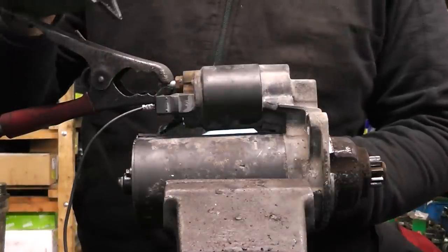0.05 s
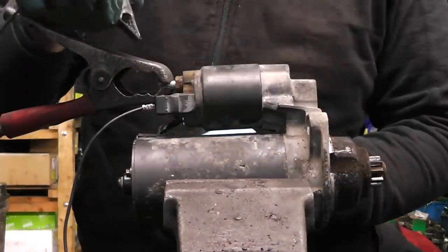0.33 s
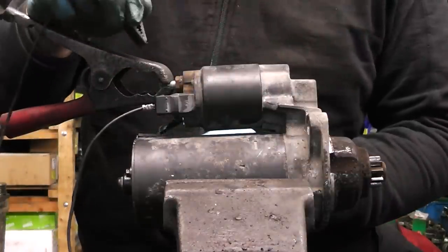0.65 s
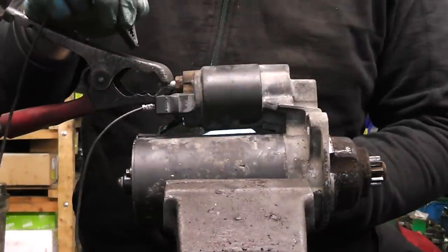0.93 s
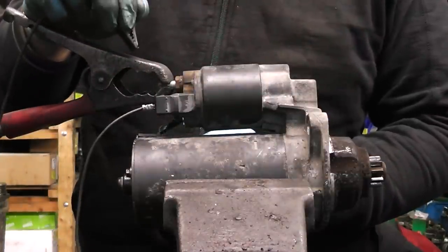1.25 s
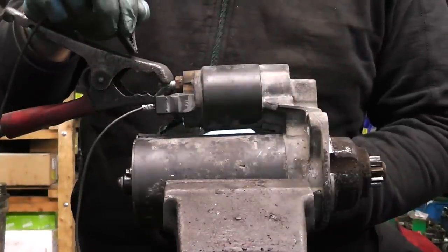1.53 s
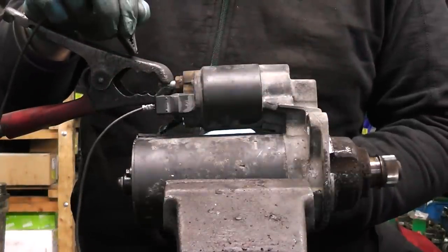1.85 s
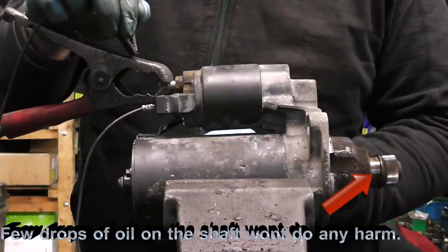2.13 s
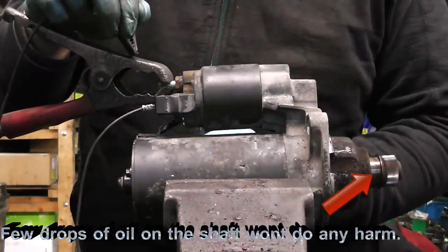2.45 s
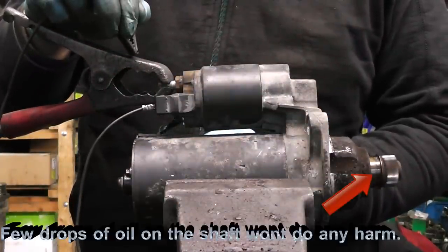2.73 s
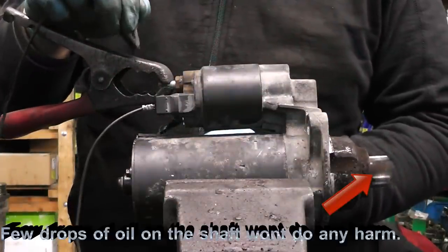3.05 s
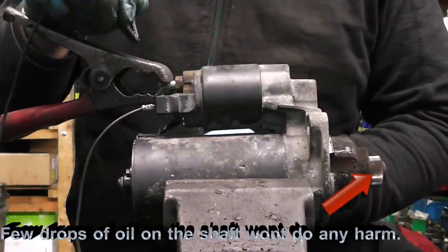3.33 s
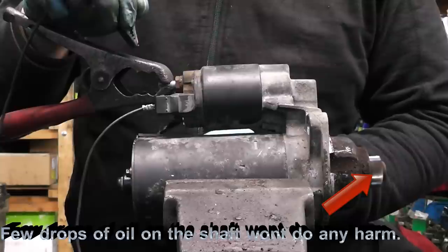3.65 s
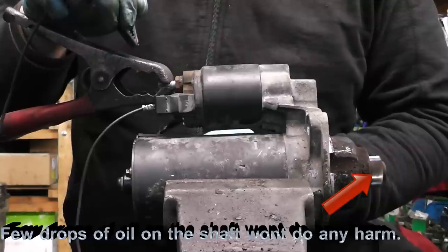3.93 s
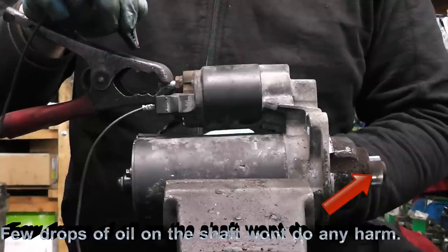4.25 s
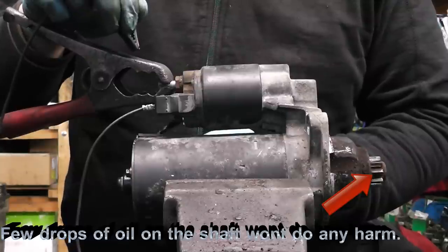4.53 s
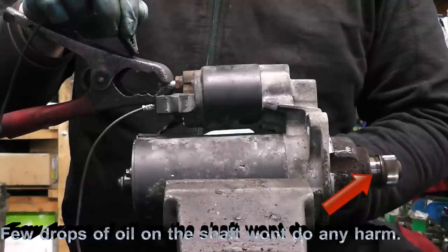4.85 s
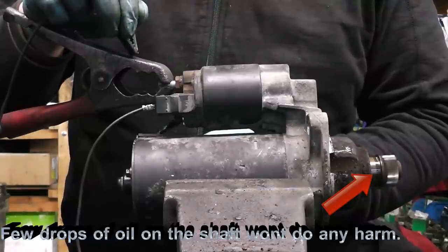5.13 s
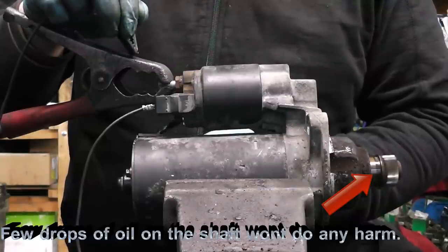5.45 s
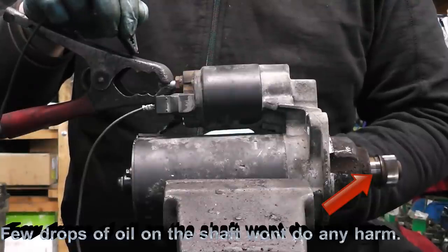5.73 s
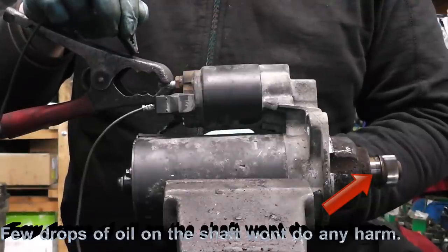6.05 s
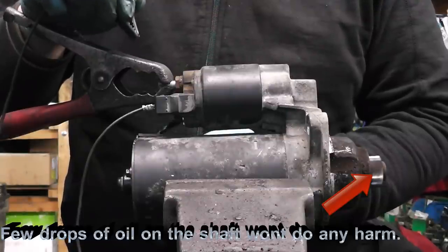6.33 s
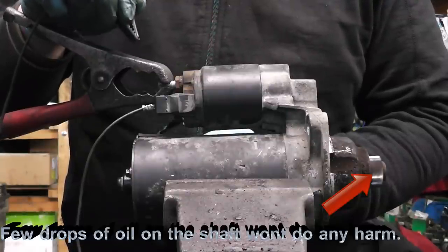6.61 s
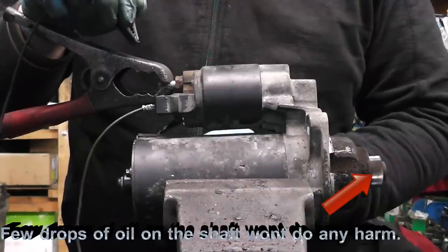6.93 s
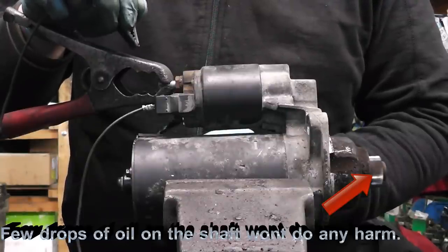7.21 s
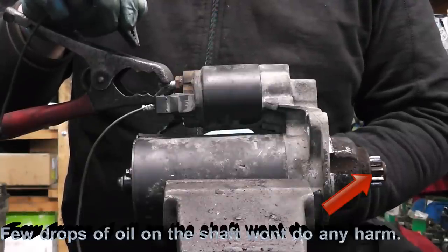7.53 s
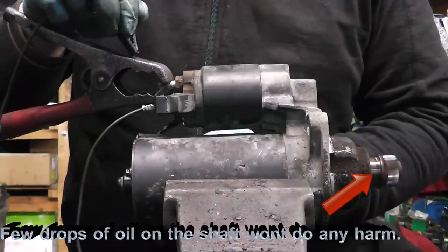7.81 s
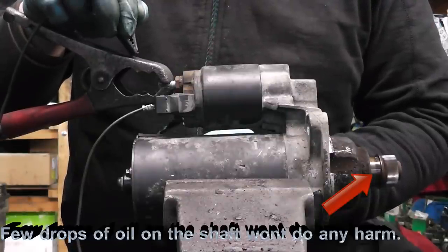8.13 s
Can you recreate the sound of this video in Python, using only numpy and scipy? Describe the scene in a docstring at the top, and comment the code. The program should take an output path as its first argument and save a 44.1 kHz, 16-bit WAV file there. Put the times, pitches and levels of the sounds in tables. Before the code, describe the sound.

Close up in a workshop, an electric starter engages with sharp metal clacks, whines at speed and ticks down to a stop.

```python
"""A starter motor clamped in a vice, heard close up: run twice on jumper leads, then started a third time.
Each time the solenoid clacks the pinion out and the armature whirs up, brushes scraping the commutator.
With the current off, the pinion knocks back and the motor coasts to a stop, ticking once a turn.
A gain control ducks at each clack, so the whir swells in from almost nothing.
Before the first start a sleeve rustles and the lead taps the terminal; a low workshop rumble lies under all."""
import sys
import numpy as np
from scipy import signal
from scipy.fft import rfft, irfft, next_fast_len
from scipy.io import wavfile
from scipy.ndimage import uniform_filter1d

SR = 44100
rng = np.random.default_rng(int(sys.argv[2]) if len(sys.argv) > 2 else 0)


def master_out(mix):
    """Clip the mix to full scale and print it as 16-bit PCM to the path in sys.argv[1]."""
    frames = np.transpose(np.atleast_2d(mix))
    ceiling = np.clip(frames, -1, 1)
    pcm = np.round(ceiling * 32767).astype(np.int16)
    wavfile.write(sys.argv[1], SR, pcm)


N = 360738
TIME = np.arange(N) / SR

# motor runs: current on t/s, current off t/s, free speed/(turns/s), high bar under a brush t/s
MOTOR_RUNS = [(1.827, 3.2525, 153.2, 4.473), (4.880, 6.322, 150.7, 7.4784), (8.004, 9.4, 148, 8.1)]
# stereo width, side against mid: f/Hz, level/dB
STEREO_WIDTH = [(100, -26), (400, -20), (900, -17), (2000, -28), (4000, -14), (8000, -12), (13000, -6.5)]


def amp(db):
    """Decibels to gain."""
    return 10 ** (np.asarray(db) / 20)


def curve_at(points, hz):
    """Reads a curve of breakpoints along a log-frequency axis."""
    f, value = np.transpose(points)
    return np.interp(np.log(hz + 1), np.log(f + 1), value)


def add(mix, start_s, sound):
    """Mixes a sound in at its cue."""
    part = mix[..., round(start_s * SR):][..., :sound.shape[-1]]
    part += sound[..., :part.shape[-1]]


def wander(n, hz):
    """Smooth random modulation of rms 1, rolling off above hz."""
    size = next_fast_len(n)
    f = np.fft.rfftfreq(size, 1 / SR)
    spectrum = rfft(rng.standard_normal(n), size) / (1 + (f / hz) ** 4)
    return unit_rms(irfft(spectrum, size)[:n])


def unit_rms(x):
    """Scales to rms 1."""
    return x / np.sqrt(np.mean(x ** 2) + 1e-20)


def levelled(x, size=5000):
    """Irons out a sound's slow swells and keeps its grain."""
    return x / np.sqrt(abs(uniform_filter1d(x ** 2, size)) + 1e-12)


def band(x, hz, kind):
    """Keeps the low or the high side of a sound."""
    return signal.sosfiltfilt(signal.butter(4, hz, kind, fs=SR, output="sos"), x)


def colour(x, spectrum, resonances=(), size=4096):
    """Minimum-phase EQ: a broad curve with resonances standing on it."""
    f = abs(np.fft.fftfreq(size, 1 / SR))
    peaks_db = sum(lift / (1 + (2 * (f - hz) / width) ** 2) for hz, width, lift in resonances)
    log_gain = np.log(amp(curve_at(spectrum, f) + peaks_db))
    response = np.fft.ifft(np.exp(np.conj(signal.hilbert(log_gain)))).real
    return signal.oaconvolve(x, response[:size // 2])[:len(x)]


def room_tone(level_db=-41, left_db=1.59, swell_db=-0.96, width=.11):
    """A bed of low workshop rumble, nearly mono, gently wavering."""
    # rumble spectrum: f/Hz, level/dB
    rumble = [(15, -29), (28, 0), (60, -6), (92, -2), (190, -10), (300, -17), (480, -23), (820, -17.5),
              (1300, -25.5), (2050, -31.5), (2500, -49), (3300, -53), (5000, -43), (7000, -52),
              (16000, -53)]
    mid, side = (unit_rms(colour(rng.standard_normal(N), rumble, size=16384)) for _ in range(2))
    level = amp(level_db + swell_db * wander(N, 2.7))
    return level * np.array([(mid + width * side) * amp(left_db), (mid - width * side) * amp(-left_db)])


def room_reverb(x, wet_db=-21):
    """A small, cluttered room: sparse echoes, each band dying at its own rate."""
    # reverb time: f/Hz, t60/s
    decay_times = [(100, 0.21), (1000, 0.24), (4000, 0.033), (15000, 0.0467)]
    echoes = rng.choice([-1., 1.], (2, SR // 2)) * (rng.random((2, SR // 2)) < .1)
    hz, t, bands = signal.stft(echoes, SR, nperseg=256)
    decay = amp(-60 * t / curve_at(decay_times, hz)[:, None])
    tail = signal.istft(bands * decay, SR, nperseg=256)[1]
    return amp(wet_db) * signal.oaconvolve(x[None], tail / np.linalg.norm(tail[0]), axes=1)[:, :N]


def near_reflections(x, size=300):
    """Reflections off vice and bench differ left and right, widening the treble most."""
    taps = rng.standard_normal(size) * np.linspace(1, 0, size)
    side = colour(signal.oaconvolve(x, taps / np.linalg.norm(taps))[:N], STEREO_WIDTH)
    return np.array([x + side, x - side])


def sleeve(grain_db=0.5):
    """Cloth rubs faintly as the hand brings the lead to the terminal; each stroke swells and fades."""
    # strokes of glove and sleeve: centre t/s, length/s, level/dB
    strokes = [(.02, 0.065, -50.5), (0.126, 0.138, -63.5), (0.333, 0.31, -61.5), (0.728, 0.14, -59),
               (0.835, 0.13, -65.5)]
    # rustle spectrum: f/Hz, level/dB
    cloth = [(1000, -12), (3200, -12), (4400, 2), (6000, 0), (8500, -3), (12000, 1), (16000, -8)]
    level = sum(amp(db) * np.exp(-(2 * (TIME - s) / length) ** 2) for s, length, db in strokes)
    rustle = unit_rms(colour(rng.standard_normal(N), cloth))
    return rustle * level * amp(grain_db * wander(N, 120))


def ring(modes, rise_s=0.00012, detune=0.036):
    """Damped modes set going by one blow; no two blows land quite alike."""
    t = np.arange(SR // 4) / SR
    out = np.zeros(len(t))
    for hz, db, t60 in modes:
        pitch = hz * (1 + detune * rng.standard_normal())
        out += amp(db - 60 * t / t60) * np.sin(2 * np.pi * (pitch * t + rng.random()))
    return out * (1 - np.exp(-t / rise_s))


def crack(hold_s=0.004, rattle_db=-12, rattle_t60=0.14):
    """Steel on steel: a sharp burst, then a short rattle of the loose parts."""
    # impact spectrum: f/Hz, level/dB
    steel = [(100, -9.5), (900, 3.5), (2000, 2), (3000, -3), (4500, 4.5), (8000, 2), (12000, 3),
             (16000, -10)]
    t = np.arange(SR // 4) / SR
    envelope = np.exp(-(t / hold_s) ** 4) + amp(rattle_db - 60 * t / rattle_t60)
    return colour(envelope * rng.standard_normal(len(t)), steel)


def jumper_lead():
    """The lead ticks lightly on the terminal and its clamp rings."""
    # touches: t/s, tick level/dB, ring level/dB
    touches = [(0, -60, -39), (0.5544, -44.5, -48), (0.561, -51.5, -61), (.602, -59, -55),
               (0.699, -54, -48), (0.8346, -57, -39.5)]
    # clamp modes: f/Hz, level/dB, t60/s
    clamp = [(1075, 0.5, 0.054), (1385, 1.5, 0.058), (1595, -5.5, 0.25), (1950, -1, 0.05),
             (4500, -13, 0.092), (4640, -16, 0.06)]
    out = np.zeros(N)
    for s, tick_db, ring_db in touches:
        add(out, s, amp(tick_db) * crack() + amp(ring_db) * ring(clamp))
    return out


def solenoid():
    """Plunger, contacts and pinion hit their stops: steel cracks, the housing rings, the bench thuds."""
    # blows: t/s, crack level/dB, ring level/dB, thud level/dB
    blows = [(1.8128, 2.5, 1.5, -8), (1.818, -11, 5.5, 1.5), (1.833, 2, -2, -5.5), (3.2551, -7, -8, -10),
             (3.2720, -27, -16, -13.5), (3.292, -26, -20, -11.5), (4.8410, -28, -34, -36),
             (4.8579, 4.5, -7, 1), (4.864, -2.5, 9.5, 6), (4.88, 0.5, -5, -9), (6.322, -11, -4, -9),
             (6.338, -24.5, -9.5, -9.5), (6.355, -30, -8, -11), (7.9681, -35, -28.5, -36), (7.985, 6, 2, 4),
             (7.9921, -4, 3, -26.5), (8.004, 2, -4, -8)]
    # housing modes: f/Hz, level/dB, t60/s
    housing = [(717, -4.5, 0.065), (811, -13, 0.11), (986, -6, 0.078), (1275, -13, 0.13), (1413, -8, 0.047),
               (1570, -6, 0.063), (1847, 2, 0.048), (2150, -14, 0.1)]
    # bench modes: f/Hz, level/dB, t60/s
    bench = [(104.7, -1.5, 0.064), (130, 0.5, 0.089), (187.7, 5.5, 0.063), (257, -25, 0.035),
             (330.8, 0, 0.053), (436, -6, 0.024), (547, -4.5, 0.054)]
    out = np.zeros(N)
    for s, crack_db, ring_db, thud_db in blows:
        clack = amp(crack_db) * crack() + amp(ring_db) * ring(housing)
        add(out, s, clack + amp(thud_db) * ring(bench, rise_s=0.0017))
    return out


def shaft(on, off, free_speed, high_bar_at):
    """Armature speed (turns/s) and turns: current spins it up, friction and drag bring it to rest."""
    spin_up_s, creep_s, creep_share = .19, .436, .23  # a quick rise, then a creep to free speed
    friction, drag_s = 98.4, 6.7  # turns/s lost each second; time constant of the drag
    driven, coasted = np.clip(TIME, on, off) - on, np.maximum(TIME - off, 0)
    shortfall = (1 - creep_share) * np.exp(-driven / spin_up_s) + creep_share * np.exp(-driven / creep_s)
    speed = free_speed * (1 - shortfall)
    speed = np.maximum((speed + friction * drag_s) * np.exp(-coasted / drag_s) - friction * drag_s, 0)
    turns = np.cumsum(speed) / SR
    return speed, turns - np.interp(high_bar_at, TIME, turns)


def snap(length_s=0.001):
    """One short scratch of a brush over the edge of a commutator bar."""
    t = np.arange(SR // 100) / SR
    return np.exp(-(t / length_s) ** 2) * rng.standard_normal(len(t))


def coasting_ticks(tick_db=-12.5, gentle_speed=26, skim_speed=70, skim_db=-6):
    """The high bar snaps a brush once a turn, clearest as the motor slows; then the last bars slip by."""
    # tall bars catching just before the stop: t/s, level/dB
    last_bars = [(4.509, -17), (4.549, -21), (4.555, -24), (4.61, -27), (7.572, -23), (7.603, -33),
                 (7.613, -23), (7.633, -31)]
    # spectrum of a brush snap: f/Hz, level/dB
    snap_tone = [(300, -36), (1500, -22), (3000, -6), (4500, 2), (7000, 8), (9600, 5.5), (12500, -5),
                 (14500, -17), (16000, -24)]
    out = np.zeros(N)
    for on, off, free_speed, high_bar_at in MOTOR_RUNS:
        speed, turns = shaft(on, off, free_speed, high_bar_at)
        new_turn = np.diff(np.floor(turns)) > 0
        for i in np.flatnonzero(new_turn & (TIME[1:] > off) & (speed[1:] > 10)):
            force = np.tanh(speed[i] / gentle_speed) * amp(tick_db + skim_db * (speed[i] / skim_speed) ** 2)
            add(out, TIME[i] - .0005, force * snap())
    for s, db in last_bars:
        add(out, s, amp(db) * snap())
    return colour(out, snap_tone)


def brushes(turns, speed, bar_db=-4, high_bar_db=10, uneven=0.46, skim_speed=95, bars=23):
    """Carbon scrapes the commutator and catches on each bar's edge; one high bar ticks once a turn."""
    release_per_ms = 0.52
    place = turns * bars
    heights = amp(bar_db) * np.exp(uneven * rng.standard_normal(bars))
    heights[0] = amp(high_bar_db)
    since_edge_ms = 1000 * (place % 1) / (bars * np.maximum(speed, 1))
    catch = heights[np.floor(place).astype(int) % bars] * np.exp(-since_edge_ms * release_per_ms)
    grip = 1 + catch / (1 + (speed / skim_speed) ** 2)  # at speed the brushes skim
    return unit_rms(grip * rng.standard_normal(len(turns)))


def gears(turns, speed, mesh_db=13, fade_db=-14.5, strain_db=4, throb_db=-5, looseness=.8):
    """The planet gears whine, most at low speed and under strain, throbbing as the planets pass."""
    mesh_order, planet_order = 22.8, 2.6  # cycles per turn
    n = len(turns)
    strain = np.clip(np.gradient(speed) * SR / 700, 0, 1)  # full when gaining 700 turns/s each second
    jitter = 1 + looseness * (wander(n, 26.7) + 1j * wander(n, 32))
    teeth = (jitter * np.exp(2j * np.pi * mesh_order * turns)).real
    throb = 1 + 2 * amp(throb_db) * wander(n, 12) * np.cos(2 * np.pi * planet_order * turns)
    level = amp(mesh_db + fade_db * (speed / 150) ** 2 + strain_db * strain)
    return level * teeth * unit_rms(throb)


def clutch(turns, speed, drone_db=1, overrun_db=3, wobble=0.627, order=.87):
    """The clutch drones just below shaft speed, louder when it overruns as the motor slows."""
    n, slowing = len(turns), np.gradient(speed) < 0
    jitter = 1 + wobble * (wander(n, 30) + 1j * wander(n, 37))
    drone = (jitter * np.exp(2j * np.pi * order * turns)).real
    return amp(drone_db + overrun_db * slowing) * drone


def armature(turns, speed, whine_db=4, fade_db=-6, hump_db=-4.5, sway_turns=.0013, flutter=.28):
    """Slots, magnets and gears shake the casing at whole multiples of the shaft speed."""
    # main vibrations: multiple of shaft speed, level/dB
    orders = [(1, 4), (3, 2.5), (4, 2.5), (7, 4.5), (8, 1), (9, 1.6), (10, 3), (11, -1), (12, 2.7),
              (13, 3.1), (15, 3.5), (16, -0.5), (17, 2.5), (18, -3), (19, -3.5), (20, -13.5), (21, -1),
              (22, 2.5), (23, 8.5), (24, -15), (25, 4.5), (27, 2.64), (28, 2), (29, 1), (30, -1.5), (31, 3),
              (32, -2.5), (33, 1.5), (34, -9), (35, -7), (36, 0.5), (37, 2), (38, -13), (39, -22),
              (40, -0.5), (41, -10), (44, -2), (45, -2.5), (47, -3), (49, -25.5)]
    n, order_db, order_limit = len(turns), dict(orders), 110
    angle = 2 * np.pi * (turns + sway_turns * wander(n, 39))  # play in the bearings
    knots = np.arange(0, n + 1500, 1500)  # each order flutters to a new strength every 34 ms
    whine = np.zeros(n)
    for k in range(1, order_limit):
        hump = amp(hump_db) * np.sin(np.pi * k / order_limit)  # the other orders form a broad hump
        height = amp(order_db[k]) if k in order_db else hump
        strength = np.interp(np.arange(n), knots, 1 + flutter * rng.standard_normal(len(knots)))
        whine += height * strength * np.sin(k * angle + 2 * np.pi * rng.random())
    return amp(whine_db + fade_db * speed / 150) * whine


def motor(run, split_hz=2900, air_hz=10500, dull=0.91, dull_speed=45, sing_in_s=0.41, settle_s=0.032):
    """One run's cue and stereo whir: armature, gears, clutch and brushes sound through the casing."""
    # path through the bearings to the casing: f/Hz, level/dB
    bearings = [(55, -7), (95, 6), (140, -3), (250, -6), (600, -4), (750, -2), (1050, 3), (1400, 0),
                (1850, 2), (2500, -5), (3300, -7), (4000, 4), (5500, 1), (12000, -2)]
    # narrow resonances on that path: f/Hz, width/Hz, lift/dB
    end_plate = [(1800, 50, 2), (4800, 50, 4), (5368, 50, 8)]
    # the casing's broad response: f/Hz, level/dB
    shell = [(40, -51.5), (110, -19.5), (200, -15), (450, -22), (620, -21), (750, -21.5), (2000, -16.5),
             (2400, -18.5), (3300, -22.5), (3800, -18), (8000, -19), (12000, -22), (14500, -26.5),
             (15800, -19)]
    # casing resonances: f/Hz, width/Hz, lift/dB
    casing = [(763, 149, 19), (996, 123, 13.5), (1175, 88, 8), (1441.3, 130, 10.5), (1645.3, 92, 7),
              (1834.5, 76, 11), (1952, 184, 9.5), (4042.5, 490, 11), (4716, 360, 5.5), (5544, 1240, 10),
              (5970, 120, 6.5), (7080, 370, 7), (7740, 1670, 9.5), (9487, 800, 13), (11070, 1860, 15),
              (13120, 1014, 13), (13764, 339, -5)]
    # louder with speed, swelling at some speeds: speed/(turns/s), whine level/dB, scrape level/dB
    loudness = [(0, -47, -55.5), (6.06, -34, -39), (19.76, -25, -25), (50, -24, -22), (82.7, -18.5, -15),
                (95, -20, -14), (114, -16, -12), (135.8, -15.5, -8), (141.4, -13, -10.5), (147.8, -16, -11)]
    # the brushes sing a little more with the current off: f/Hz, width/Hz, lift/dB
    brush_song = [(7530, 980, 2.5)]
    on, off = run[:2]
    speed, turns = shaft(*run)
    stop = TIME[speed > 1][-1]
    span = (TIME >= on) & (TIME < stop + .1)
    t, speed, turns = TIME[span], speed[span], turns[span]

    shaking = armature(turns, speed) + gears(turns, speed) + clutch(turns, speed)
    shaking *= 2 * np.sqrt(speed / SR)
    whir = colour(brushes(turns, speed) + colour(shaking, bearings, end_plate), shell, casing)
    body, hiss = band(whir, split_hz, "low"), band(whir, split_hz, "high")
    coasting = np.clip((t - off) / sing_in_s, 0, 1)
    hiss = hiss + coasting * (colour(hiss, [(0, 0)], brush_song) - hiss)

    speeds, whine_db, scrape_db = np.transpose(loudness)
    settling = np.exp(-np.maximum(t - stop, 0) / settle_s)
    whine_gain = amp(np.interp(speed, speeds, whine_db)) * settling
    scrape_gain = amp(np.interp(speed, speeds, scrape_db)) * settling
    mid = levelled(body) * whine_gain + levelled(hiss) * scrape_gain
    far_brush = levelled(colour(brushes(turns, speed), shell, casing))  # differs left and right
    side = colour(far_brush, STEREO_WIDTH) * scrape_gain
    stereo = np.array([mid + side, mid - side])
    stereo -= dull * np.exp(-speed / dull_speed) * band(stereo, air_hz, "high")  # a slow scrape is duller
    edge_fades = signal.windows.tukey(len(t), 0.0062 / (t[-1] - t[0]))
    return t[0], stereo * edge_fades


def scene():
    """The starter on its bench, in the workshop."""
    starter = near_reflections(solenoid() + jumper_lead() + sleeve() + coasting_ticks())
    for run in MOTOR_RUNS:
        add(starter, *motor(run))
    return starter + room_reverb(starter.mean(0)) + room_tone()


def record(dry):
    """Gain control ducks at each clack, recovers slowly and holds the motor level; then a low-pass."""
    threshold_db, ratio, recovery_db_per_s = -19, 14, 36.5
    sense_above_hz, cutoff_hz = 1700, 15900
    sidechain = signal.lfilter(*signal.butter(1, sense_above_hz, "high", fs=SR), dry)
    power_db = 10 * np.log10(abs(uniform_filter1d((sidechain ** 2).mean(0), size=150)) + 1e-12)
    recovery_db = recovery_db_per_s * TIME
    held_db = np.maximum.accumulate(power_db + recovery_db) - recovery_db  # peaks fall away steadily
    over_db = np.maximum(held_db - threshold_db, 0)
    ducked = dry * amp(-(1 - 1 / ratio) * uniform_filter1d(over_db, size=60))
    low_pass = signal.firwin(511, cutoff_hz, window=("kaiser", 9), fs=SR)
    return signal.oaconvolve(ducked, low_pass[None], "same")


dry = scene()
out = record(dry)
master_out(out)
```